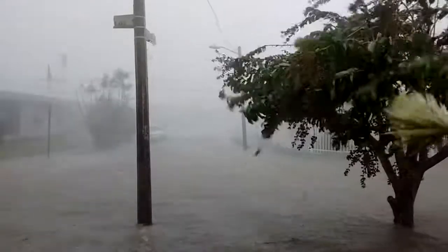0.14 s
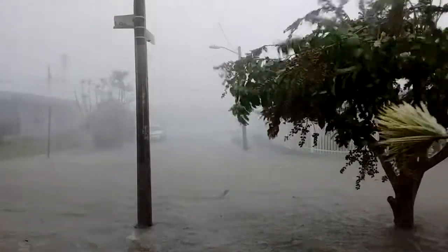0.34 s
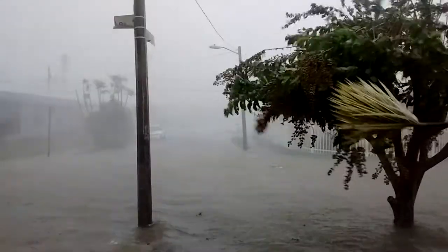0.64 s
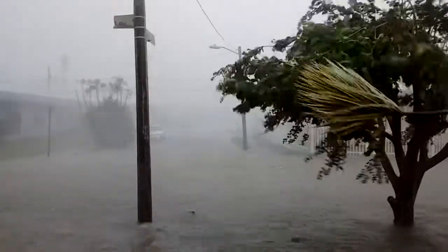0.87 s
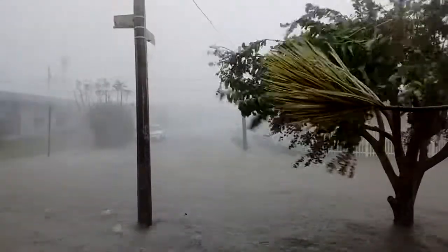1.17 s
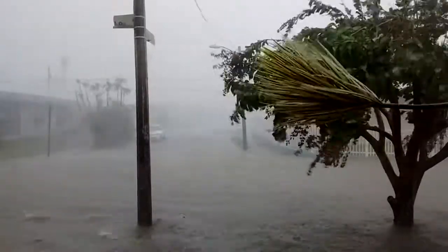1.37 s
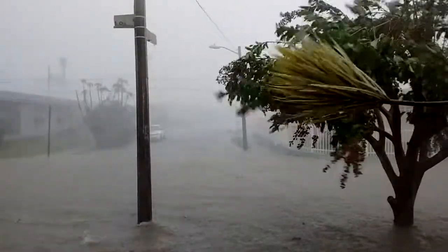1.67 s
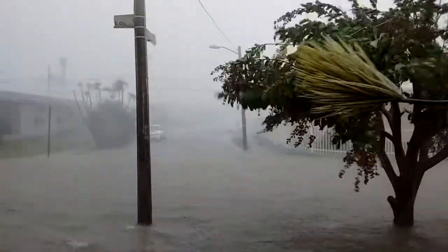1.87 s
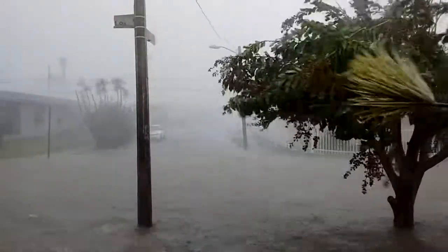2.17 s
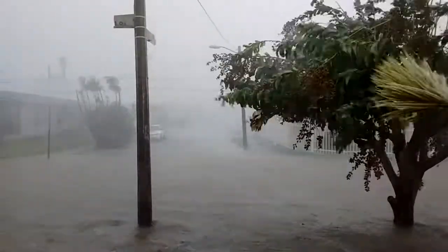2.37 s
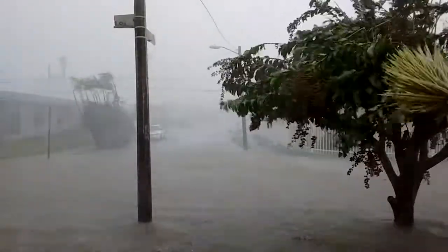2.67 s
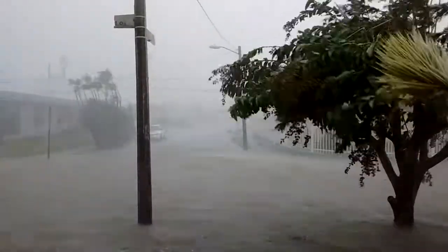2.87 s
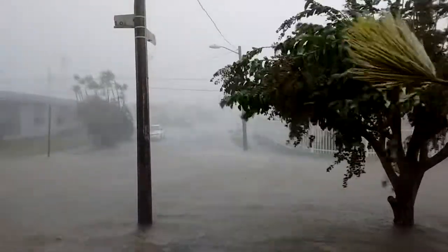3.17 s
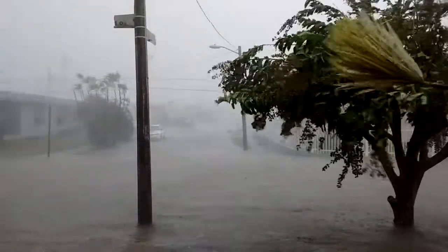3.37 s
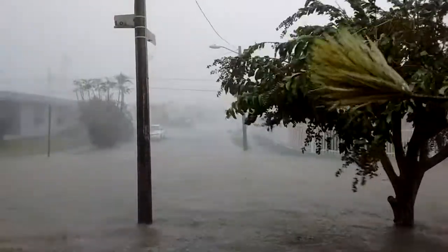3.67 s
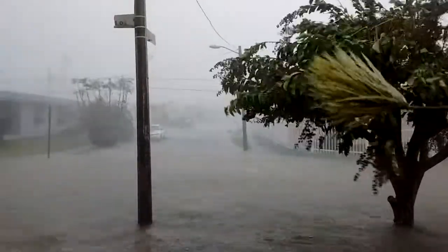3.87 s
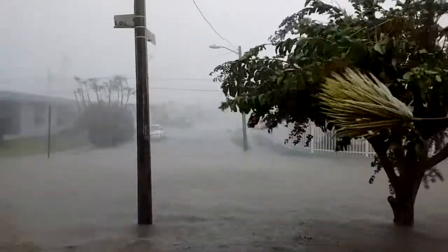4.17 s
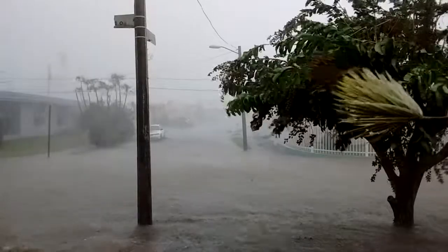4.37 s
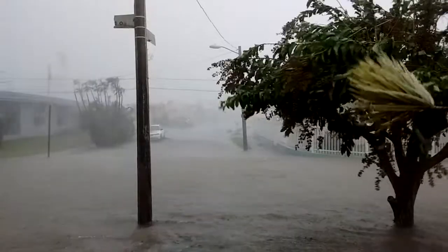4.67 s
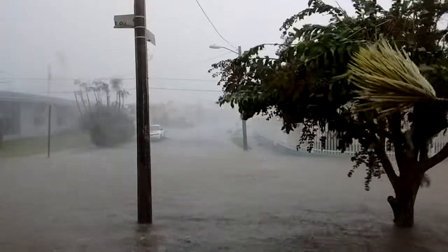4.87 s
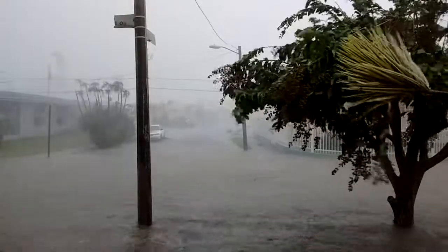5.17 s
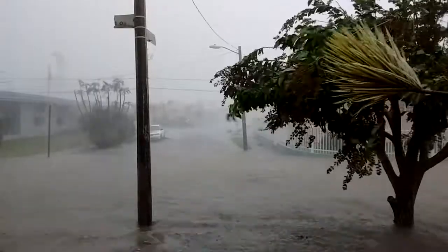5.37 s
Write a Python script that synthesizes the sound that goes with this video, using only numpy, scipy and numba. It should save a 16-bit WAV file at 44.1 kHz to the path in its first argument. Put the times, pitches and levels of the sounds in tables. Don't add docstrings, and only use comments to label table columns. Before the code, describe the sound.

A steady wall of heavy rain and low, swelling storm wind outdoors, with scattered close drop ticks and a brief thud on the microphone.

```python
import sys
import numpy as np
from scipy import signal
from scipy.fft import rfft, irfft
from scipy.io import wavfile
from scipy.ndimage import uniform_filter1d
from numba import njit

SR = 44100
rng = np.random.default_rng(int(sys.argv[2]) if len(sys.argv) > 2 else 0)


def volts_from_decibels(level):
    exponent = np.asarray(level, float) / 20
    return 10 ** exponent


def unload_audio(sound):
    columns = np.transpose(np.atleast_2d(sound))
    steps = np.round(np.clip(columns, -1, 1) * 32767)
    wavfile.write(sys.argv[1], SR, steps.astype(np.int16))


N = 243873
TIME = np.arange(N) / SR
FRAME = 512


def on_log(hz, table):
    at, db = np.transpose(table)
    return np.interp(np.log(hz + 1), np.log(at), db)


def patches(shape, across, along):
    field = rng.standard_normal(shape)
    field = uniform_filter1d(field, across, axis=0)
    field = uniform_filter1d(field, along, axis=1)
    return field / field.std()


def weather(ports, colour, curve, pivot_hz, events, event_hz, event_octaves, db, shared_db, patchy_db):
    stft_settings = dict(nperseg=2 * FRAME, noverlap=3 * FRAME // 2)
    hz, s, spec = signal.stft(ports, SR, **stft_settings)
    mean_power = np.mean(abs(spec) ** 2, axis=(0, 2))
    flat = spec / np.sqrt(uniform_filter1d(mean_power, size=5))[:, None]

    when, strength_db, tilt_db = np.transpose(curve)
    octaves = np.clip(np.log2((hz + 1) / pivot_hz), -2.5, 2.5)
    gain_db = np.interp(s, when, strength_db) + np.outer(octaves, np.interp(s, when, tilt_db))

    passing_db = sum(rise * np.exp(-((s - at) / length) ** 2) for at, length, rise in events)
    event_shape = np.exp(-(np.log2((hz + 1) / event_hz) / event_octaves) ** 2)
    gain_db += np.outer(event_shape, passing_db)

    third = np.clip(3 * np.log2((hz + 1) / 20), 0, 31).astype(int)
    gain_db += shared_db * patches((1, len(s)), across=1, along=9)
    gain_db += patchy_db * patches((32, len(s)), across=2, along=7)[third]

    out = signal.istft(flat * volts_from_decibels(gain_db), SR, **stft_settings)[1][:, :N]
    colour_gain = volts_from_decibels(on_log(np.fft.rfftfreq(N, 1 / SR), colour))
    out = irfft(rfft(out) * colour_gain, N)
    return out * volts_from_decibels(db) / out.std()


def wind():
    # (frequency [Hz], level [dB])
    wind_colour = [(25, -7.5), (42, -8.5), (60, -11), (80, -3), (110, -1.5), (150, -1), (200, -3.5),
                   (280, -6), (400, -9.5), (560, -11.5), (800, -14.5), (1200, -17), (2500, -31.5),
                   (6000, -46)]
    # (time [s], strength [dB], brightening from rumble to roar [dB per octave])
    gusts = [(0.0, -38, -0.5), (0.1, -36, -0.5), (0.55, -35.5, 0.5), (0.75, -37.5, .5), (0.95, -35, -.5),
             (1.2, -38.5, -0.5), (1.7, -33.5, .5), (2.0, -35.5, -1), (2.5, -36, 1), (2.75, -33.5, 1),
             (3.08, -34.5, 0), (3.25, -32, 1), (3.7, -34.5, 0), (4.2, -31.5, 2.5), (4.6, -31.5, -0.5),
             (4.9, -33.5, 1), (5.12, -30.5, -0.5), (5.53, -32, 1.5)]
    # (time [s], length [s], rise [dB])
    eddies = [
        (0.524, .07, 9),
        (1.0, .08, 3),
        (1.398, .08, 5.5),
        (1.88, 0.11, 2),
        (2.298, .15, -2),
        (3.207, 0.088, 4.5),
        (3.496, 0.064, 2.5),
        (4.1, 0.088, 3),
        (4.617, .06, -7),
        (5.15, .1, -9),
    ]
    return weather(rng.standard_normal((2, N)), wind_colour, gusts, pivot_hz=600,
                   events=eddies, event_hz=110, event_octaves=0.92,
                   db=-21, shared_db=0.74, patchy_db=1.0)


@njit
def rings(start, hz, t60, size):
    out = np.zeros(N + SR)
    for k in range(len(start)):
        pole = np.exp(2j * np.pi * hz[k] / SR - np.log(1000) / (t60[k] * SR))
        z = size[k] + 0j
        for i in range(int(t60[k] * SR)):
            out[start[k] + i] += z.imag
            z *= pole
    return out[:N]


def splashes(count, spread_db, cycles):
    chance = rng.random((count, 3)).T
    start = (chance[0] * N).astype(int)
    hz = 700 * 20 ** chance[1]
    size = volts_from_decibels(-spread_db * np.log(1.001 - chance[2]))
    out = rings(start, hz, cycles / hz, size)
    return out / out.std()


def rain():
    # (frequency [Hz], level [dB])
    rain_colour = [(300, -14), (800, -13.5), (1400, 0), (2000, -1.5), (3500, -2), (4200, -5.5), (5000, -7),
                   (6500, -11), (8200, -9), (9500, -14), (11000, -17)]
    rain_colour += [(12300, -24), (13700, -28), (15000, -25.5)]
    # (time [s], downpour [dB], nearness as brightening [dB per octave])
    sheets = [(0.0, -25.5, 1), (0.08, -24.5, 0.5), (0.23, -27.5, 0.5), (0.8, -28, 0.5), (0.92, -25, 0),
              (1.14, -31, 0.5), (1.77, -26, 0), (2.0, -29, 0.5), (2.23, -24, 1), (3.19, -25.5, 0.5),
              (3.25, -22.5, 0.5), (3.33, -26.5, 0.5), (4.8, -25.5, -1), (4.93, -29, 0), (5.13, -25, -1),
              (5.33, -27, 1), (5.42, -24, -2), (5.53, -27.5, 0.5)]
    # (time [s], length [s], rise [dB])
    thrashes = [
        (.1, .1, -0.5),
        (2.3, 0.26, 1.5),
        (2.6, 0.23, 1),
        (3.4, 0.093, 1.5),
        (4.45, 0.16, -1.5),
        (5.33, .12, 2),
    ]
    far = rng.standard_normal((2, N))
    near = np.array([splashes(count=30000, spread_db=2.5, cycles=6.3) for port in range(2)])
    return weather(far + volts_from_decibels(-6.5) * near, rain_colour, sheets, pivot_hz=3000,
                   events=thrashes, event_hz=2700, event_octaves=0.79,
                   db=-24.5, shared_db=0.34, patchy_db=0.71)


def ticks():
    # (time [s], peak [dB], pitch [Hz], bright spit above peak [dB], lean to the left [dB], added on
    # the left and taken off on the right, capped at 4 dB each way)
    near_drops = [(0.3284, -20, 3750, -4, 29), (1.771, -21, 4770, -14, 7), (1.9038, -18, 3930, -6.5, -1),
                  (2.0207, -21, 3590, -5, 0), (2.087, -21, 3980, -5, -2), (2.1994, -14, 4240, -14, 4),
                  (2.268, -23, 4240, -8, -2), (2.6304, -17, 4050, -9, 2.0), (3.256, -13, 3900, -13, 3.5),
                  (3.292, -16.5, 4370, -3, -1), (3.3974, -27, 4010, -6, -9), (3.4643, -20, 3360, -1, -3),
                  (3.6394, -18, 3950, -11, 11), (4.1675, -10, 3670, -18, -2), (4.7294, -20.5, 4070, -5, 3),
                  (4.8456, -18, 3830, -3, 1), (5.195, -20, 4000, -6, -29), (5.4105, -18.5, 3850, -4.5, -1)]
    s, db, hz, spit_db, pan_db = np.transpose(near_drops)
    start = (s * SR).astype(int)
    ports = np.zeros((2, N))
    for port, lean_db in zip(ports, np.clip([pan_db, -pan_db], -4, 4)):
        port += rings(start, hz, 0.011 + 0 * s, volts_from_decibels(db + lean_db - 4))
        for spit_hz in (7860.0, 8110.0, 7370.0, 10100.0):
            drop_hz = spit_hz * (1 + 0.036 * rng.standard_normal(len(s)))
            port += rings(start, drop_hz, 0.023 + 0 * s, volts_from_decibels(db + lean_db + spit_db - 6.0))
    return ports


def bumps():
    # (time [s], level [dB], pitch [Hz], length [s])
    buffets = [
        (1.045, -19.5, 170, 0.0035),
        (1.05, -29, 294, 0.0057),
        (1.051, -22, 386, 0.0045),
        (1.058, -21, 106, 0.0076),
        (1.075, -20, 184, 0.0039),
        (1.363, -27.5, 173, 0.0094),
    ]
    out = np.zeros(N)
    for s, db, hz, length in buffets:
        swing = np.cos(2 * np.pi * hz * (TIME - s) + 2 * np.pi * rng.random())
        out += volts_from_decibels(db) * swing * np.exp(-((TIME - s) / length) ** 2)
    return out


def widen(ports):
    # (frequency [Hz], share [0-1])
    taken_off = [(20, 0.85), (250, 0.9), (900, 0.78), (1550, 0.73), (4800, 0.41), (9400, 0.39), (10800, 0),
                 (15400, .55)]
    # (frequency [Hz], phase [half turns])
    lateness = [(0, 0), (300, .035), (600, .2), (1200, .8), (1550, 1), (9400, 5.95), (12400, 7),
                (15400, 9.05)]
    # (frequency [Hz], level [dB])
    case_shade = [(200, 2), (1500, 0.5), (4500, -1.5), (6000, -3), (7000, -4.5), (9500, 2.5), (14000, -2.5)]
    size = N + FRAME
    hz = np.fft.rfftfreq(size, 1 / SR)
    roll_off = np.clip((15600 - hz) / 500, 0, 1) ** 0.5
    left, right = rfft(ports, size) * roll_off
    right = right * volts_from_decibels(on_log(hz, case_shade))
    share = np.clip(np.interp(hz, *np.transpose(taken_off)), 0, 1)
    other = share * np.exp(-1j * np.pi * np.interp(hz, *np.transpose(lateness)))
    wide_left = left - other * right
    wide_right = (right - other * left) * volts_from_decibels(-1.05)
    return irfft(np.array([wide_left, wide_right]), size)[:, :N]


def scene():
    storm = wind() + rain() + ticks()
    return widen(storm) + bumps()


def top_cut(x):
    return signal.sosfilt(signal.butter(12, 15870, fs=SR, output="sos"), x)


def record(dry):
    # (time [s], drop [dB], recovery [s])
    ducks = [
        (.16, 2, 0.77),
        (1.056, 1, 0.38),
        (3.3, 1, 0.12),
        (4.85, 1, 0.12),
    ]
    duck_db = sum(drop * (TIME > s) * np.exp(-abs(TIME - s) / back) for s, drop, back in ducks)
    gain = volts_from_decibels(-uniform_filter1d(duck_db, size=200))
    return top_cut(dry * gain)


dry = scene()
out = record(dry)
unload_audio(out)
```